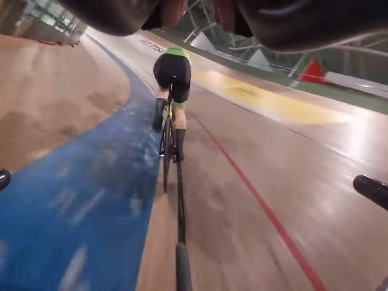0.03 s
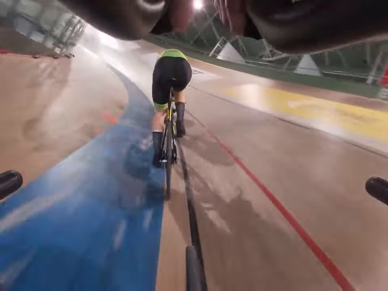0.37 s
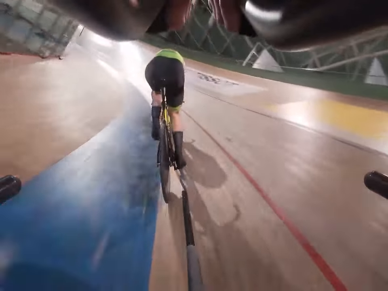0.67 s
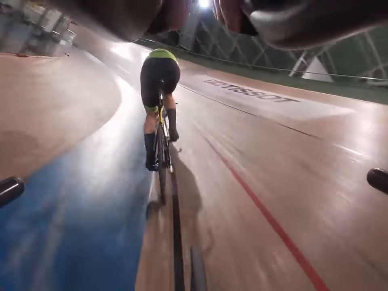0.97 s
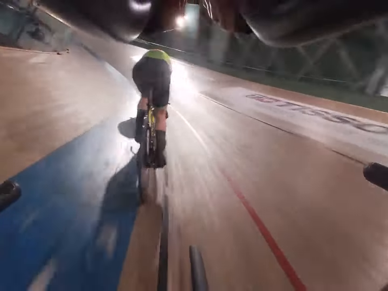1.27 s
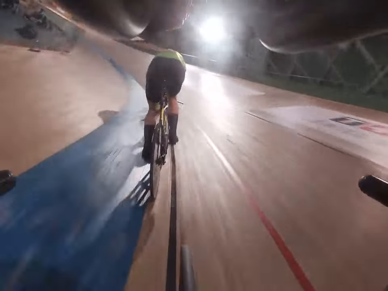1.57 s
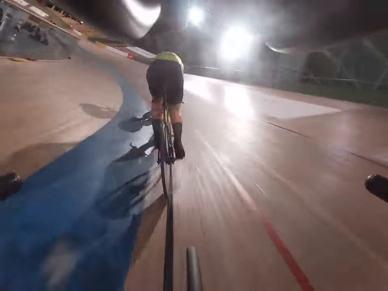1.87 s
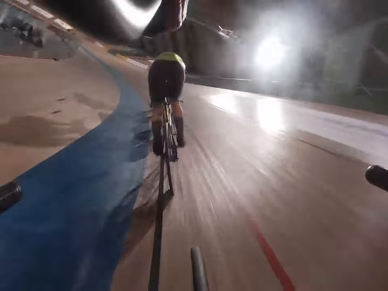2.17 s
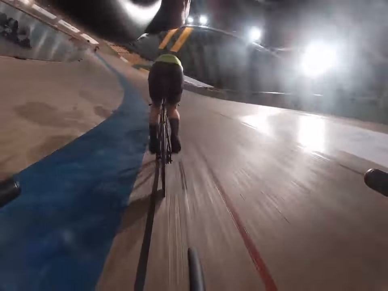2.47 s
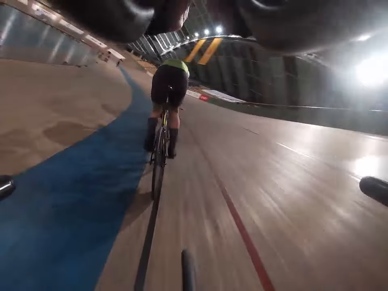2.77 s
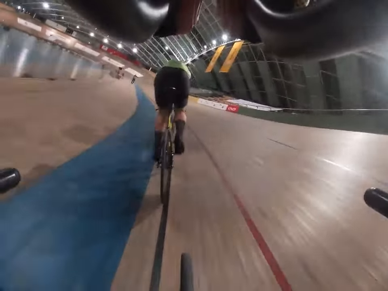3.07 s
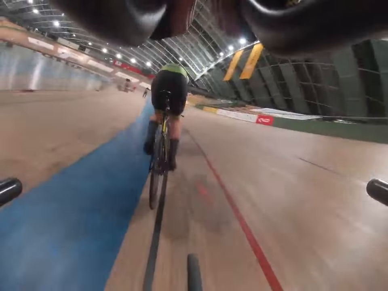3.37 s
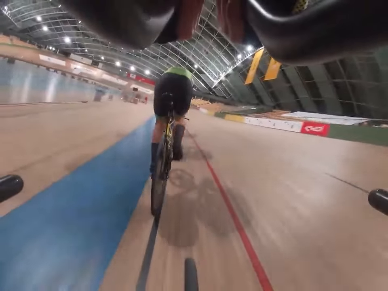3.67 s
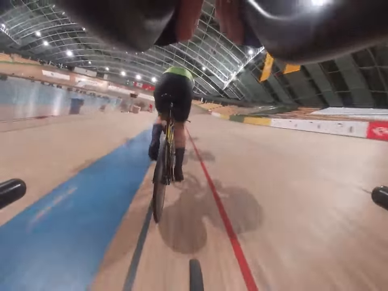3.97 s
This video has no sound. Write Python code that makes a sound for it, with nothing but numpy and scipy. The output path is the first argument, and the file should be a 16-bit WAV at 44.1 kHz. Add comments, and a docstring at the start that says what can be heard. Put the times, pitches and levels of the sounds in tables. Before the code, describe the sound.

Deep, churning wind hits a microphone under the handlebars of a fast track bicycle, gusting and popping throughout. Tyres roll steadily on indoor wooden boards behind it, with a faint chain purr and small ticks, mostly in the second half.

```python
"""Rumbling, buffeting wind on a microphone under the handlebars of a track bicycle at speed.
It is the churning wake of the rider ahead, with ragged gusts, sharp pops and brief lulls.
The tyres roar and hiss on the indoor wooden boards, the chain purrs over its teeth, and the bicycle
ticks now and then and squeaks once. A limiter holds the bass of the wind down."""
import sys
import numpy as np
from scipy import signal
from scipy.fft import rfft, irfft
from scipy.io import wavfile
from scipy.ndimage import uniform_filter1d, minimum_filter1d

SR = 44100
rng = np.random.default_rng(int(sys.argv[2]) if len(sys.argv) > 2 else 0)


def put_to_file(sound):
    """Save the sound as 16-bit audio at rate SR, in the file named by the first command-line argument."""
    columns = np.atleast_2d(sound).T  # one column per channel
    safe = np.clip(columns, -1, 1)
    whole_steps = np.round(safe * 32767)
    wavfile.write(sys.argv[1], SR, whole_steps.astype(np.int16))


N = 176400
TIME = np.arange(N) / SR


def amp(db):
    """Decibels to gain."""
    return 10 ** (np.asarray(db) / 20)


def unit(x):
    """Scales to rms 1."""
    return x / np.sqrt(np.mean(x ** 2) + 1e-20)


def level(curve):
    """A fader ride through (time [s], level [dB]) points, as gain."""
    return amp(np.interp(TIME, *np.transpose(curve)))


def add(mix, start_s, sound):
    """Mixes a sound in at its start time."""
    part = mix[max(round(start_s * SR), 0):][:len(sound)]
    part += sound[:len(part)]


def noise(spectrum):
    """Noise of rms 1 with the given spectrum, silent above its last point."""
    hz, db = np.transpose(spectrum)
    bins_hz = np.fft.rfftfreq(N, 1 / SR)
    shape = amp(np.interp(np.log(bins_hz + 1), np.log(hz), db, right=-np.inf))
    return unit(irfft(rfft(rng.standard_normal(N)) * shape, N))


def wander(low_hz, high_hz):
    """Random motion of rms 1 between two rates."""
    hz = np.fft.rfftfreq(N, 1 / SR)
    shape = hz / np.hypot(hz, low_hz) / np.sqrt(1 + (hz / high_hz) ** 4)
    return unit(irfft(rfft(rng.standard_normal(N)) * shape, N))


def steadied(x, window_s):
    """Evens out the slow chance swells of a noise."""
    power = uniform_filter1d(x ** 2, int(window_s * SR) + 1)
    return x / np.sqrt(abs(power) + 1e-9)


def band(x, low_hz, high_hz):
    """Band-pass, scaled to rms 1."""
    return unit(signal.sosfilt(signal.butter(2, [low_hz, high_hz], "band", fs=SR, output="sos"), x))


def rumble(shelter_db):
    """Large eddies push on the microphone; smaller ones throb in the upper bass."""
    # fader rides of the deep wind and the throb (time [s], level [dB])
    deep_ride = [(0,-19.5),(.8,-18),(1.65,-18.5),(1.85,-15.5),(2.8,-16.5),(4,-19.5)]
    throb_ride = [(0,-21.5),(.2,-19),(.4,-20.5),(.6,-20),(1.1,-21),(1.6,-20.5),(2.3,-19),(2.7,-24),(3.35,-21),(3.53,-18.5),(3.7,-22.5),(4,-19.5)]
    # their tone colours (frequency [Hz], relative level [dB])
    deep_spectrum = [(8,-21),(22,5.5),(68,7.5),(100,-3),(150,-13.5),(400,-66)]
    throb_spectrum = [(60,-20),(98,3),(145,-4),(240,-11),(400,-24),(1200,-71)]
    deep = level(deep_ride) * steadied(noise(deep_spectrum), window_s=0.054)
    throb = level(throb_ride) * steadied(noise(throb_spectrum), window_s=0.072)
    return amp(shelter_db) * (deep + throb)


def gusts(gain_db=-1, ragged_db=4.0, skew=0.56, attack_s=0.001):
    """Each gust swells quickly and fades, torn by small eddies; some are brighter than others."""
    # gusts striking the microphone (time [s], length [s], relative level [dB], tilt [dB/octave])
    hits = [(0.0,0.037,-25,2),(0.11,0.2,-27,-1.5),(0.155,0.018,-19,-2.5),(0.249,0.12,-23.5,-0.5),(0.267,0.0086,-16,0.5),(0.38,0.023,-21.5,-2),(0.453,0.021,-23,-2.5),(0.554,0.059,-22,-5),(0.686,0.027,-22,-6.5),(0.708,0.031,-20.5,-2.5),(0.82,0.033,-20,-5),(0.867,0.014,-20.5,-1.5),(0.926,0.02,-19.5,-1),(0.95,0.12,-26,-4.5),(1.069,0.082,-29,-3),(1.301,0.03,-24.5,-3.5),(1.45,0.049,-21,-2.5),(1.491,0.16,-25,-3.5),(1.587,0.023,-27,4.5),(1.715,0.022,-23,-8.5),(1.813,0.0081,-19.5,-3),(1.891,0.091,-27.5,3),(1.957,0.027,-24.5,0),(2.036,0.035,-27.5,-1.5),(2.135,0.07,-27.5,-1),(2.213,0.032,-24.5,1),(2.365,0.014,-26,2),(2.41,0.031,-26,-8),(2.533,0.021,-23,-3.5),(2.649,0.08,-29.5,-0.5),(2.761,0.055,-26,-7),(2.776,0.015,-27.5,4),(2.831,0.026,-22.5,-1),(2.992,0.031,-25.5,-2),(3.062,0.039,-22,1),(3.209,0.042,-22,-0.5),(3.501,0.071,-22.5,1.5),(3.714,0.11,-25.5,-3),(3.891,0.014,-20,-1)]
    # tone colour of a gust before its tilt (frequency [Hz], relative level [dB])
    spectrum = [(90,-18),(200,-0.5),(320,-4),(530,-10.5),(1400,-13),(2100,-18.5),(3200,-29),(5000,-39),(8000,-75.5)]
    size = 16384
    octaves = np.log2(np.clip(np.fft.rfftfreq(size, 1 / SR), 500, 3000) / 1000)
    air = steadied(noise(spectrum) * amp(ragged_db * wander(low_hz=40, high_hz=242)), window_s=0.015)
    out = np.zeros(N)
    for start_s, length_s, db, tilt_db in hits:
        progress = np.arange(0, 1, 1 / (length_s * SR))[:size]
        swell = np.sin(np.pi * progress ** skew) * np.minimum(progress * length_s / attack_s, 1)
        puff = np.roll(air, -round(start_s * SR))[:size]
        tilted = irfft(rfft(puff) * amp(tilt_db * octaves))
        add(out, start_s, amp(db + gain_db) * swell * tilted[:len(swell)])
    return out


def pops(cycles_to_peak=0.8):
    """A small eddy bursts on the microphone: a cycle or two of pressure."""
    # single eddies (time [s], envelope peak [dB], pitch [Hz])
    eddies = [(.123,-17.5,1250),(.2372,-16,900),(0.2572,-10.5,1090),(.891,-15,646),(1.113,-17.5,397),(1.43,-12.5,1160),(1.531,-12,630),(1.69,-18,890),(1.878,-10.5,566),(2.277,-17,750),(2.8854,-18,1100),(3.109,-15,1030),(3.741,-15.5,1400)]
    t, out = TIME[:SR // 40], np.zeros(N)
    for start_s, db, hz in eddies:
        age = hz * t / cycles_to_peak
        envelope = (age * np.exp(1 - age)) ** 2
        add(out, start_s, amp(db) * envelope * np.sin(2 * np.pi * (hz * t + rng.random())))
    return out


def flutter(turbulence, shelter_db, level_db=-30, depth_db=4):
    """Small eddies rattle the midrange in bursts of a few milliseconds."""
    # tone colour of the eddies (frequency [Hz], relative level [dB])
    spectrum = [(80,-26),(200,3.5),(350,2.5),(1000,-5.5),(1500,-10.5),(2200,-18),(3300,-43),(8000,-77.5)]
    bursts = noise(spectrum) * amp(depth_db * turbulence)
    return amp(level_db + shelter_db) * steadied(bursts, window_s=0.057)


def lulls():
    """The dip in dB of rumble and flutter while the microphone is briefly sheltered."""
    # sheltered moments (centre [s], half length [s], depth [dB])
    dips = [(0.339,0.019,-5),(0.436,0.052,-3),(0.643,0.013,-13),(0.758,0.011,-9),(1.043,0.011,-7),(1.194,0.019,-4),(1.668,0.018,-5.5),(1.774,0.029,-3.5),(2.006,0.021,-8),(2.103,0.019,-9),(2.922,0.016,-8.5),(3.341,0.033,-5)]
    return sum(db * np.exp(-((TIME - centre_s) / half_s) ** 2) for centre_s, half_s, db in dips)


def tyres(level_db=-34.5):
    """The steady roar of tyres rolling on the boards."""
    # tone colour of the roar (frequency [Hz], relative level [dB])
    spectrum = [(60,-16),(200,9.5),(320,6.5),(550,-7.5),(1100,-11.5),(1700,-20.5),(2700,-17.5),(4000,-24),(7000,-69.5)]
    return amp(level_db) * noise(spectrum)


def hiss(turbulence, gain_db=-3.5, depth_db=3.0, grain_db=3.0):
    """Grainy air and tyre hiss, shaken a little by the turbulence."""
    # fader ride of the hiss (time [s], relative level [dB])
    ride = [(0,-40),(.4,-46.5),(.92,-42),(1.08,-52.5),(1.5,-38.5),(2.05,-51.5),(2.42,-40.5),(2.65,-43.5),(3.85,-45.5),(4,-55)]
    # its tone colour (frequency [Hz], relative level [dB])
    spectrum = [(600,-5.5),(1500,-4.5),(2600,5),(3150,-4.5),(4000,-1.5),(4500,-10.5),(5700,-11.5),(6800,-27.5),(9000,-52)]
    flicker_db = depth_db * turbulence + grain_db * wander(low_hz=25, high_hz=200)
    return amp(gain_db) * level(ride) * unit(noise(spectrum) * amp(flicker_db))


def ticks(rise_s=0.0004, scrape_decay_s=0.0011, ring_t60_s=0.015):
    """A small hard part of the bicycle scrapes briefly and rings in quickly damped modes."""
    # ticks (time [s], scrape level [dB], ring relative to scrape [dB])
    hits = [(0.5256,-41,-5),(1.559,-43,-7),(2.143,-35,-14),(2.148,-30.5,-5.5),(2.331,-32.5,-13),(2.443,-33,-2.5),(2.899,-38,-21),(3.0725,-31,-14),(3.6323,-37,-18)]
    # resonances of the part (frequency [Hz], relative level [dB])
    modes = [(2840,3),(5410,5.5),(6480,-7),(8750,-11),(10300,-9)]
    t, out = TIME[:SR // 30], np.zeros(N)
    attack = np.minimum(t / rise_s, 1)
    for start_s, db, ring_db in hits:
        ring = sum(amp(mode_db - 60 * t / ring_t60_s) * np.sin(2 * np.pi * (hz * t + rng.random()))
                   for hz, mode_db in modes)
        scrape = band(rng.standard_normal(len(t)), low_hz=2300, high_hz=5900)
        scrape *= np.exp(-t / scrape_decay_s)
        add(out, start_s, amp(db) * attack * (amp(ring_db) * ring + scrape))
    return out


def chain(level_db=-56.5, teeth_per_s=83, decay_s=0.0061, wobble=0.0044, uneven_db=4.0, rub=0.13):
    """Each link lands on a tooth with a bright rustle, some harder than others, over steady rubbing."""
    # tone colour of links meeting teeth (frequency [Hz], relative level [dB])
    spectrum = [(3300,-7.5),(4030,1.5),(4750,-14.5),(5650,-1.5),(6200,-12.5),(6900,-13.5),(7700,-24.5),(8750,-24),(11000,-38.5)]
    rate = teeth_per_s * (1 + wobble * wander(low_hz=0.73, high_hz=5.7))  # uneven pedalling
    teeth = np.cumsum(rate) / SR
    since_strike_s = (teeth % 1) / teeth_per_s
    force = amp(uneven_db * np.clip(rng.standard_normal(N), -2, 2))[teeth.astype(int)]
    strikes = force * unit(since_strike_s * np.exp(-2 * since_strike_s / decay_s))
    return amp(level_db) * unit(strikes + rub) * noise(spectrum)


def squeak(level_db=-55, centre_s=2.497, half_s=0.022):
    """One faint, thin squeak of the drivetrain."""
    swell = np.exp(-((TIME - centre_s) / half_s) ** 2)
    return amp(level_db) * swell * band(rng.standard_normal(N), low_hz=4400, high_hz=4560)


def scene():
    """Wind up front, tyres and drivetrain behind it, at one microphone."""
    turbulence = np.clip(wander(low_hz=5, high_hz=75), -2.5, 1.6)
    shelter_db = lulls()
    wind = rumble(shelter_db) + flutter(turbulence, shelter_db) + gusts() + pops()
    return (wind + hiss(turbulence) + tyres() + chain() + ticks() + squeak())[None]


def record(dry, ceiling_db=-8, window_s=0.0083, bass_below_hz=590, cutoff_hz=12100):
    """A fast limiter rides the peaks of the bass; a steep low-pass trims the top."""
    bass = signal.sosfiltfilt(signal.butter(2, bass_below_hz, fs=SR, output="sos"), dry[0])
    size = int(window_s * SR) + 1
    gain = np.minimum(1, amp(ceiling_db) / (abs(bass) + 1e-9))
    gain = uniform_filter1d(minimum_filter1d(gain, size), size)  # hold, then smooth
    limited = dry + (gain - 1) * bass
    low_pass = signal.firwin(511, cutoff_hz, window=("kaiser", 9), fs=SR)
    return signal.oaconvolve(limited, low_pass[None], "same")


dry = scene()
out = record(dry)
put_to_file(out)
```